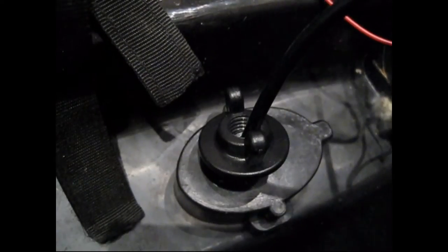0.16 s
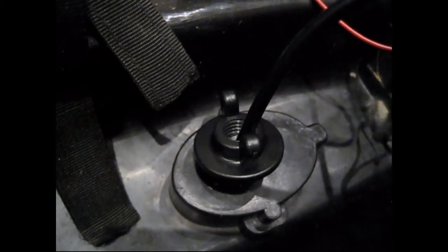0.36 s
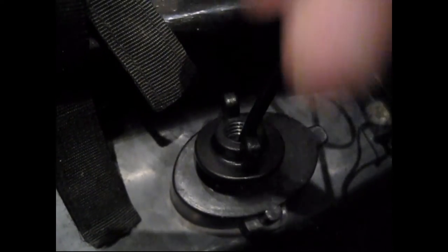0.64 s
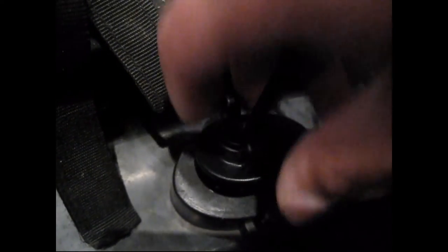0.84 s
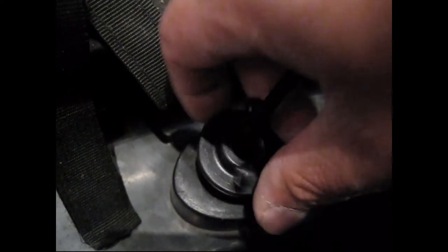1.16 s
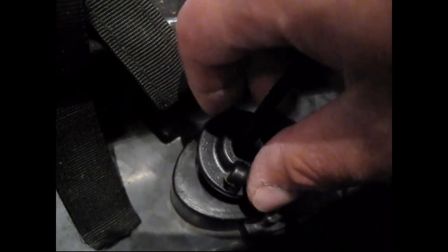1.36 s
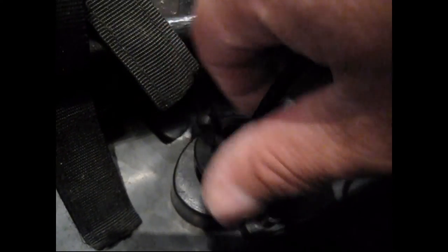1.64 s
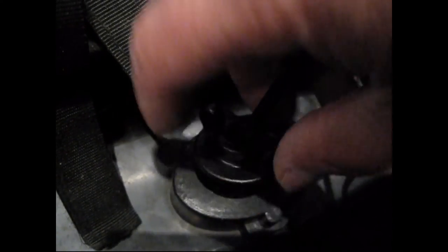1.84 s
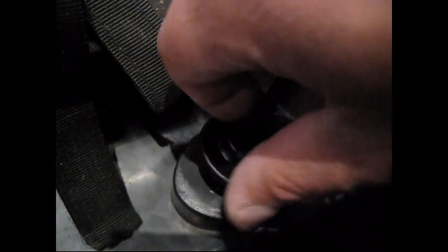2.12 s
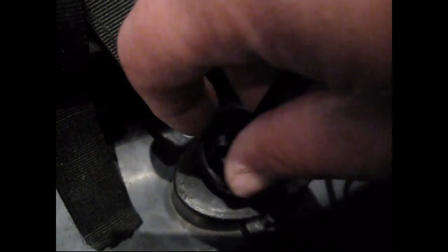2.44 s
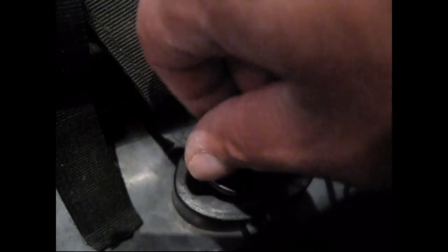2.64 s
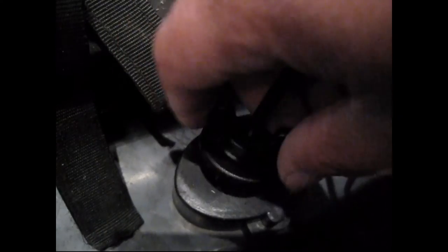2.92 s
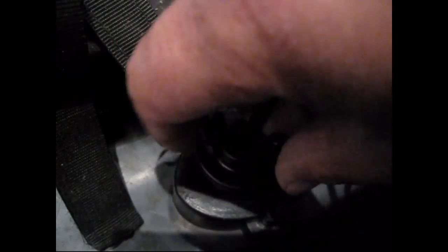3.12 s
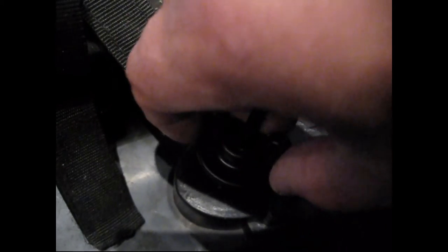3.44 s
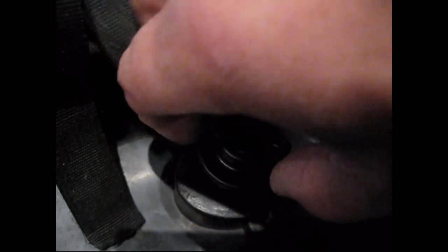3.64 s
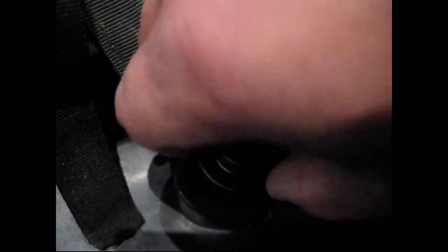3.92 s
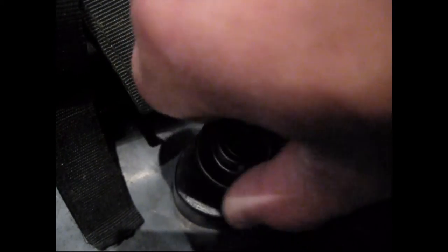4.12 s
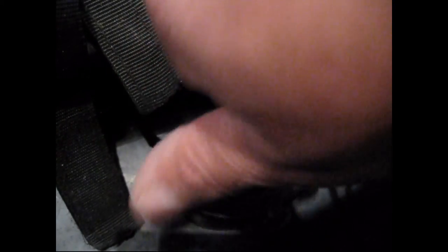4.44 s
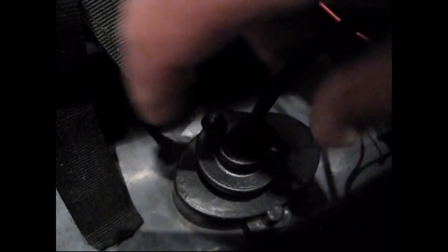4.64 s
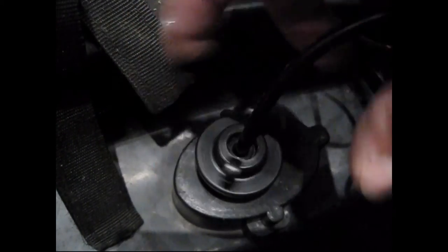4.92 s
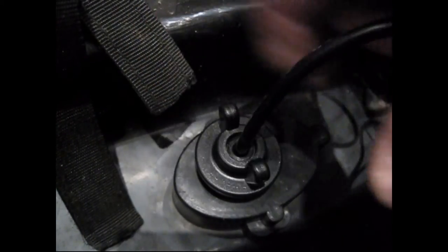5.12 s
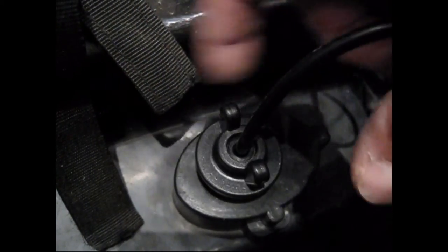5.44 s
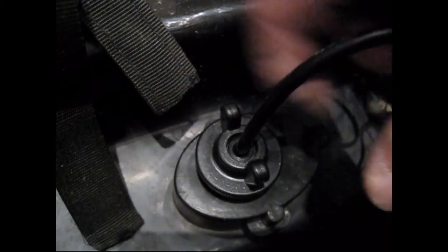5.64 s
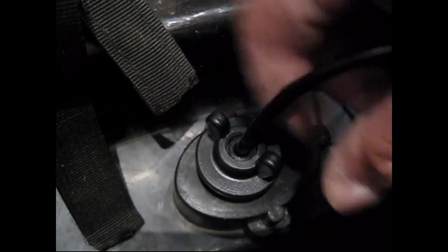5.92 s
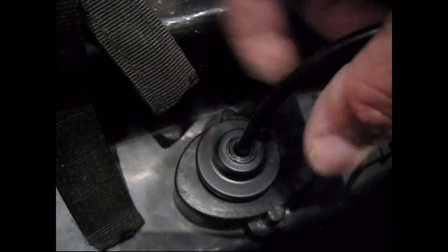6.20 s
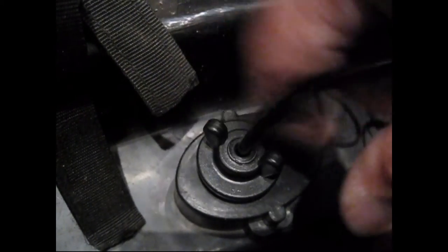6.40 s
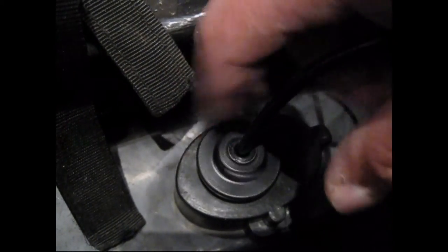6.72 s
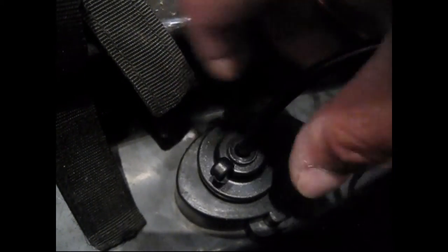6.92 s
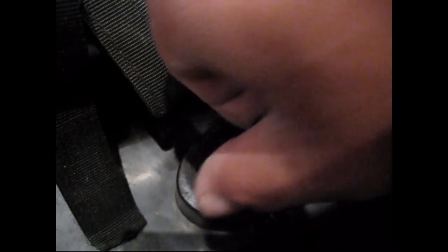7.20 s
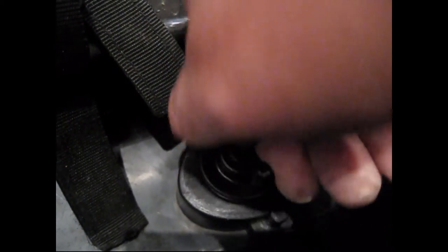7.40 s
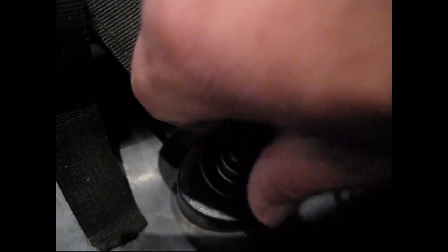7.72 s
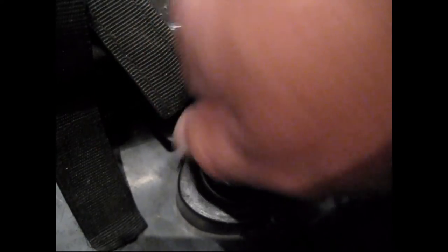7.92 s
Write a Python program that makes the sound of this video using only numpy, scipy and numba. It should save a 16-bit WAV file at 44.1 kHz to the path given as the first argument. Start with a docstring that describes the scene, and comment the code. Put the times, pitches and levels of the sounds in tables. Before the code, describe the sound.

Close, hollow plastic clicks and stick-slip grinding come in short bursts as fingers twist a nut, then harder knocks thud through a hull panel.

```python
"""A plastic wing nut is spun by hand down a threaded stem inside a boat hull, close to the microphone.
It opens on faint rumble and hiss with a finger's brush; then turns grip, grind in stick-slips and knock.
After three seconds the knocks thin out while the turning goes on; from about 4.5 s they return harder,
and between 5 and 6.7 s some jolt the hull panel. The last turns squeak, scrape and settle near 8 s.
Contact forces ring modes of nut, stem and hull, whose echoes hold the low notes; squeaks are rough tones."""
import sys
import numpy as np
from scipy import signal
from scipy.fft import rfft, irfft
from scipy.io import wavfile
from numba import njit

SR = 44100
rng = np.random.default_rng(int(sys.argv[2]) if len(sys.argv) > 2 else 0)


def to_wav(sig):
    """Store sig (one row per channel, or 1-D mono) as 16-bit WAV at the path in sys.argv[1].

    Samples outside -1..1 are clipped; the rate is SR.
    """
    pcm = np.clip(np.atleast_2d(sig), -1, 1) * 32767
    pcm = np.round(pcm).astype(np.int16)
    wavfile.write(sys.argv[1], SR, pcm.T)  # frames by channels


N = 355313
TIME = np.arange(N) / SR

# colour of the rumble and hiss: (f/Hz, relative level/dB)
AIR_COLOUR = [(15, -37), (25, -1.5), (141, -6), (293, -8.5), (3000, -20), (16000, -30)]
# modes of nut, stem and hull, low to high: (f/Hz, t60/s, relative level/dB)
BODY_MODES = [(138.3, 0.14, -3), (294, 0.16, 13), (402.2, 0.063, 0.5), (597.4, 0.054, -3.5),
              (767.3, 0.11, -6.5), (910, 0.0093, 3), (1357, 0.031, 5), (1596, 0.011, 3.5),
              (2130, 0.012, -1.5), (4020, 0.0019, 3.5), (4845, 0.0066, 1), (9130, 0.0017, 2),
              (11460, 0.0088, -2.5)]
# crowded small modes of panel, boom, nut, edge and tick: (t60/s, level against the strong modes/dB)
SMALL_MODES = [(0.16, -10), (0.058, -2), (0.054, -8), (0.011, 3), (0.0019, 1.5)]
# range of each of these five registers: (low f/Hz, high f/Hz)
REGISTER_RANGES = [(90, 300), (275, 750), (680, 2500), (2200, 6800), (8400, 12900)]
# the hand takes hold, turns and lets go: (t/s, length/s, thread grinding level/dB, skin friction level/dB)
HAND_TURNS = [(0.866, 0.088, -38, -44.5), (1.061, 0.21, -52, -43.5), (1.399, 0.23, -45.5, -57),
              (1.846, 0.29, -44.5, -57), (2.175, 0.29, -43.5, -82), (2.69, 0.22, -56.5, -52),
              (3.04, 0.15, -55, -53), (3.275, 0.033, -49, -52.5), (3.564, 0.18, -45.5, -68),
              (3.991, 0.15, -45.5, -61), (4.26, 0.26, -45.5, -72), (4.739, 0.18, -31.5, -57),
              (5.184, 0.14, -44, -43), (5.508, 0.089, -45.5, -60), (5.728, 0.23, -51, -47),
              (6.021, 0.18, -54, -40.5), (6.318, 0.21, -55, -46.5), (6.636, 0.22, -51, -46.5),
              (7.02, 0.057, -52, -38.5), (7.233, 0.12, -37, -39), (7.425, 0.25, -44, -42),
              (7.766, 0.23, -43.5, -41.5)]
# skin sticks to the plastic and squeaks: (t/s, length/s, f/Hz, level/dB)
SKIN_SQUEAKS = [(0.243, 0.023, 2260, -38.5), (3.168, 0.0025, 11300, -11.5), (5.274, 0.012, 9200, -19.5),
                (5.521, 0.022, 9480, -19.5), (7.162, 0.07, 9550, -35), (7.5, 0.029, 2930, -27),
                (7.503, 0.023, 5330, -21.5)]
# a finger slides off a wing or along the cable: (t/s, length/s, level/dB, skin hiss relative level/dB)
FINGER_RUBS = [(0.104, 0.14, -49, 0.5), (0.262, 0.019, -37.5, 0), (0.288, 0.0033, -23.5, 5.5),
               (1.742, 0.023, -27.5, -3), (2.3, 0.02, -48, 17), (2.713, 0.057, -38.5, 6.5),
               (3.614, 0.12, -37.5, -1.5), (4.405, 0.026, -51, 14), (4.539, 0.049, -36.5, 1),
               (4.951, 0.053, -37, -1.5), (5.214, 0.067, -35, -1.5), (5.795, 0.021, -33, 3),
               (6.124, 0.052, -28, -3), (6.297, 0.085, -35, 1.5), (6.392, 0.023, -29.5, 10.5),
               (6.597, 0.035, -39.5, 3.5), (6.745, 0.048, -31.5, 2), (7.497, 0.1, -35.5, 0.5),
               (7.795, 0.015, -26.5, 6)]
# the thread binds and scrapes: (t/s, length/s, level/dB)
THREAD_SCRAPES = [(0.874, 0.007, -21.5), (0.953, 0.022, -29), (1.069, 0.042, -34.5), (1.143, 0.035, -32.5),
                  (1.243, 0.016, -27), (1.306, 0.0073, -31.5), (1.569, 0.093, -41.5), (1.86, 0.045, -32.5),
                  (2.232, 0.036, -37), (2.396, 0.089, -45.5), (2.7, 0.024, -37), (2.797, 0.0091, -38.5),
                  (2.837, 0.08, -41), (3.066, 0.025, -33), (4.755, 0.054, -23), (4.827, 0.068, -34),
                  (5.75, 0.0093, -47), (5.796, 0.032, -18), (6.12, 0.098, -23), (7.785, 0.028, -31.5)]
# centres of the singing bands of the thread's faces: (f/Hz)
THREAD_SING = [9300, 11650, 12300]
# the stem jolts the hull panel: (t/s, level/dB)
PANEL_THUDS = [(5.018, -16.5), (5.274, -18.5), (5.576, -24), (6.081, -20.5), (6.406, -25.5), (6.653, -17)]
# the nut, or the cable that runs through it, knocks on the stem: (t/s, level/dB, hard edge relative level/dB)
NUT_KNOCKS = [(0.176, -38, 10), (0.408, -50, -2), (0.879, -21.5, -6), (0.917, -16, -1), (0.955, -25, -10),
              (1.11, -26, -25), (1.158, -20, -19), (1.212, -12, -20), (1.245, -26.5, -3.5),
              (1.264, -15.5, -26), (1.414, -25, -28), (1.464, -20, -26), (2.211, -12.5, -25),
              (2.266, -24.5, -21), (2.32, -14.5, -37), (2.427, -27, -24), (2.459, -30, -35),
              (2.539, -11, -22), (2.591, -27, -39), (2.736, -19, -23.5), (2.849, -24, -14.5),
              (2.859, -18, -31), (3.083, -32, -42), (3.138, -25, -44), (3.167, -26, -24), (3.65, -25, -3),
              (3.755, -32, -1), (4.425, -33.5, -38), (4.501, -26.5, -16.5), (4.58, -33.5, -7),
              (4.712, -13, -15.5), (5.017, -17, -18.5), (5.028, -7.5, -13.5), (5.064, -19, 0),
              (5.089, -15.5, -13), (5.187, -10.5, -5), (5.268, -17.5, -7.5), (5.279, -14, -38),
              (5.33, -21, -5.5), (5.577, -19.5, -8.5), (5.945, -29, -18.5), (6.08, -7, -19),
              (6.129, -16.5, -12), (6.149, -14, -14), (6.173, -18.5, -34), (6.225, -14, -23),
              (6.406, -12.5, -14.5), (6.429, -13.5, -1.5), (6.655, -10.5, -16.5), (6.727, -20, -26),
              (6.767, -18, -20), (6.83, -17.5, -5.5), (7.007, -13.5, -20.5), (7.371, -28, -17),
              (7.499, -22, -7.5), (7.954, -26, -23)]

AIR_DB = -49.5
TOP_HZ = 16000
BLOW_S = .01  # a knock's level is its rms over this time
FIRMING_DB_PER_S = 3.5  # the push grows during each turn
HOLD_FROM_S, HOLD_TO_S, HOLD_DB = 0.8, 5.8, -56  # a faint steady brush of the fingers under the turns
DULL_DB, DULL_SLOPE = -22, 0.5  # contacts softer than this favour the hull, by so many dB for each dB
DULLEST_DB = 19.5  # the most that the hull gains
# typical pitch sway: a share of the pitch, but no more than so many Hz; and how often the grip changes
GRIP_SHARE, GRIP_SHIFT_HZ, GRIP_PER_S = .028, 40, 14


def undb(db):
    """Decibels to gain."""
    return np.exp(np.asarray(db) * (np.log(10) / 20))


def unit(x):
    """Scale to an energy of one."""
    return x / np.sqrt(np.sum(x ** 2) + 1e-18)


def fade(t, t60):
    """Exponential decay, 60 dB in t60."""
    return np.exp(-np.log(1000) * t / t60)


def band(x, low_hz, high_hz, order=2):
    """Butterworth band-pass."""
    sos = signal.butter(order, [low_hz, min(high_hz, TOP_HZ)], "band", fs=SR, output="sos")
    return signal.sosfilt(sos, x + 1e-18)


def add(track, s, x):
    """Mix x into the track at time s."""
    i = int(s * SR)
    track[..., i:i + x.shape[-1]] += x[..., :N - i]


def walk(rate):
    """Slow chance: random levels around zero, rate per second, joined by straight lines."""
    levels = np.clip(rng.standard_normal(N // 20), -2, 2)
    return np.interp(TIME * rate, np.arange(len(levels)), levels)


def slips(rate, spread_db):
    """Stick-slip friction: tiny releases at random moments and of uneven size, rms one."""
    sizes = undb(spread_db * np.clip(rng.standard_normal(N), -2, 2)) * rng.choice([-1, 1], N)
    releases = rng.random(N) < rate / SR
    return unit(sizes * releases) * np.sqrt(N)


def stroke(length, rise, fall):
    """Pressure of one slide: it builds up, holds and lets go (rise and fall in s)."""
    t = np.arange(int((max(length, 0) + fall) * SR)) / SR
    return np.clip(t / rise, 0, 1) * np.clip((t[-1] - t) / fall, 0, 1) ** 2


def air():
    """Faint steady rumble and microphone hiss: noise with a shaped spectrum."""
    hz, db = np.transpose(AIR_COLOUR)
    colour = undb(np.interp(np.log(np.fft.rfftfreq(N, 1 / SR) + 1), np.log(hz), db))
    noise = irfft(rfft(rng.standard_normal(N)) * colour, N)
    return unit(noise) * np.sqrt(N) * undb(AIR_DB)


def hull(x):
    """The hollow hull echoes: low notes linger, the top treble is not reflected."""
    t = TIME[:SR // 2]

    def tail(low_hz, high_hz, t60, db):
        """Diffuse echoes in one range, swelling before they decay."""
        echoes = unit(rng.standard_normal(len(t)) * fade(t, t60) * (1 - fade(t, .03)))
        return undb(db) * band(echoes, low_hz, high_hz)

    lows = tail(93, 636, t60=0.38, db=-11) + tail(650, 1650, t60=0.13, db=-10.5)
    treble = tail(2400, 7000, t60=.2, db=-19)
    return x + signal.oaconvolve(x, lows + treble)[:N]


def hull_share(db):
    """The hull's boom relative to the nut, in dB: gentle contacts are dull, hard ones ring the nut."""
    return min(DULL_SLOPE * (DULL_DB - db), DULLEST_DB)


@njit
def swing(push, step, keep):
    """A damped mass on a spring whose stiffness may change from moment to moment."""
    out, place, speed = np.empty(len(push)), 0., 0.
    for i in range(len(push)):
        speed = keep * speed - step[i] * place + push[i] + 1e-18
        place += step[i] * speed
        out[i] = place
    return out


def ring(push, hz, t60):
    """One mode; the changing grip sways its pitch, the low modes by the largest share."""
    shift = min(GRIP_SHARE, GRIP_SHIFT_HZ / hz) * walk(rate=GRIP_PER_S)
    angle, keep = np.pi * hz / SR, fade(2 / SR, t60)
    gain = np.sqrt(2 * (1 - keep)) * np.cos(angle)
    return gain * swing(push, 2 * np.sin(angle) * (1 + shift), keep)


def body(force):
    """Each register rings with its few strong modes and a crowd of small ones."""
    t, out = TIME[:SR // 5], 0
    groups = np.split(np.array(BODY_MODES), [2, 4, 9, 11])  # panel, boom, nut, edge, tick
    registers = zip(force, groups, REGISTER_RANGES, SMALL_MODES)
    for push, modes, (low_hz, high_hz), (t60, crowd_db) in registers:
        # as the point of contact moves, it favours now one mode and now another
        weights = np.array([undb(db + 3.5 * walk(rate=25)) for db in modes[:, 2]])
        weights = weights / np.linalg.norm(weights, axis=0)
        strong = np.zeros(N)
        for k, (hz, decay, _) in enumerate(modes):
            # neighbouring modes swing in opposite senses
            strong += (-1) ** k * ring(push * weights[k], hz, decay)
        sound = band(strong, low_hz, high_hz, order=4)
        # the push wanders between two crowds of small modes
        place = 2 * walk(rate=GRIP_PER_S)
        for share in (np.cos(place), np.sin(place)):
            crowd = band(rng.standard_normal(len(t)) * fade(t, t60), low_hz, high_hz, order=3)
            sound = sound + undb(crowd_db) * signal.oaconvolve(push * share, unit(crowd))[:N]
        out = out + sound / np.hypot(1, undb(crowd_db))
    return out


def turning(rise=0.0047, fall=0.079):
    """Each turn grips quickly, firms up and lets go; returns the pressure on the thread and on the skin."""
    pressure = np.zeros((2, N))
    for s, length, grind_db, skin_db in HAND_TURNS:
        push = stroke(length, rise, fall)
        push = push * undb(FIRMING_DB_PER_S * TIME[:len(push)])
        add(pressure, s, undb([[grind_db], [skin_db]]) * push)
    add(pressure, HOLD_FROM_S, undb(HOLD_DB) * stroke(HOLD_TO_S - HOLD_FROM_S, rise, fall))
    return pressure


def squeaks(rise=0.0027, fall=0.002, jitter=0.056, drift=0.0058):
    """Very fast stick-slip: a short, rough whistle whose period never quite repeats."""
    out = np.zeros(N)
    speed = 1 + jitter * walk(rate=2200) + drift * walk(rate=27)
    for s, length, hz, db in SKIN_SQUEAKS:
        push = undb(db) * stroke(length, rise, fall)
        cycles = np.cumsum(hz * speed[int(s * SR):][:len(push)]) / SR
        add(out, s, np.sqrt(2) * push * np.sin(2 * np.pi * cycles))
    return out


def fingers(rise=0.00094, fall=0.0049, edge_db=-8, nut_db=-1, boom_db=-11, squeak_rub_db=-11, glide_db=0.5):
    """Skin gliding on the plastic hisses smoothly; sliding off a wing it catches in coarser slips."""
    _, skin = turning()
    glide = skin * undb(5 * walk(rate=35)) * rng.standard_normal(N)
    # every squeak comes with a softer rub
    squeak_rubs = [(s, length, db + squeak_rub_db, 0) for s, length, _, db in SKIN_SQUEAKS]
    slide_push, hiss_push = np.zeros((2, N))
    for s, length, db, hiss_db in list(FINGER_RUBS) + squeak_rubs:
        push = undb(db) * stroke(length, rise, fall)
        add(slide_push, s, push)
        add(hiss_push, s, push * undb(hiss_db))
    grain = slips(rate=4500, spread_db=10.5)
    slide = slide_push * grain
    boom = slide * undb(boom_db)
    nut = slide * undb(nut_db) + glide * undb(glide_db)
    edge = slide + glide * undb(edge_db)
    tick = hiss_push * grain + glide * undb(-2.5)
    return np.array([np.zeros(N), boom, nut, edge, tick])


def thread(rise=0.00087, fall=0.022, boom_db=1.0, edge_db=-17, panel_db=-26, hiss_db=-6, sing_width_hz=280):
    """The thread grinds as the nut turns, and harder where it binds; the hull takes up separate jerks."""
    turn_push, _ = turning()
    nut_push = turn_push.copy()
    boom_push = turn_push * undb(boom_db)
    for s, length, db in THREAD_SCRAPES:
        push = undb(db) * stroke(length, rise, fall)
        add(nut_push, s, push)
        add(boom_push, s, push * undb(hull_share(db) + boom_db))
    jerks = slips(rate=690, spread_db=-1.0)
    grit = nut_push * slips(rate=880, spread_db=8)
    # the swaying stem favours the jerks near 400 Hz
    judder = .4 * jerks + 1.5 * band(jerks, low_hz=365, high_hz=440, order=1)
    # blunt plastic ridges mostly reach the lower part of the hard edge
    edge = undb(edge_db) * band(grit, low_hz=1430, high_hz=5230, order=1)
    # the ridges' faces sing in narrow bands, each swelling and fading
    sing = np.zeros(N)
    for hz in THREAD_SING:
        level = undb(2.5 * walk(rate=GRIP_PER_S))
        noise = rng.standard_normal(N)
        sing += level * band(noise, hz - sing_width_hz / 2, hz + sing_width_hz / 2, order=1)
    hiss = undb(hiss_db) * turn_push * sing
    # the thread catches and frees
    catch = undb(3 * walk(rate=70))
    return catch * np.array([boom_push * jerks * undb(panel_db), boom_push * judder, grit, edge, hiss])


def knocks(chatter_s=0.0054, chatter_db=-3, approach_db=-16, tick_db=-6, hardness=0.97, boom_db=-8,
           glance=0.14, rock_s=0.00781, rock_db=1.0):
    """The nut grazes the thread, strikes it and chatters as it seats; returns the force on each register."""
    force = np.zeros((5, N))
    t = TIME[:SR // 20] - TIME[SR // 100]  # time from the moment of contact
    chatter = slips(rate=1500, spread_db=3.0)
    pressure = np.where(t < 0, undb(approach_db), 1) * fade(np.abs(t), 2 * chatter_s)
    contact = (t == 0) * np.sqrt(BLOW_S * SR)
    rock_lags = rock_s * (.5 + rng.random(len(NUT_KNOCKS)))
    for k, (s, db, edge_db) in enumerate(NUT_KNOCKS):
        start = s + t[0]
        grains = chatter[k * len(t):(k + 1) * len(t)]
        rattle = undb(chatter_db) * unit(grains * pressure) * np.sqrt(BLOW_S * SR)
        # the heavy hull follows only the main contact, less so a sharp one
        boom = undb(db + boom_db + hull_share(db) - glance * edge_db) * contact
        add(force[1], start, boom)
        add(force[1], start + rock_lags[k], boom * undb(rock_db))  # the stem rocks back a moment later
        nut_edge_tick_db = db + np.array([[0], [edge_db], [hardness * edge_db + tick_db]])
        add(force[2:], start, undb(nut_edge_tick_db) * (contact + rattle))
    for s, db in PANEL_THUDS:
        add(force[0], s + t[0], undb(db) * contact)
    return force


def scene():
    """All contacts drive the same nut and hull; the squeaks skip the modes but echo in the hull."""
    contacts = body(knocks() + thread() + fingers())
    return (hull(contacts + squeaks()) + air())[None]


def record(dry, notch_hz=7900, notch_width_hz=750):
    """The recorder has a deep notch in the treble, rounds the loudest peaks and cuts the top."""
    b, a = signal.iirnotch(notch_hz, notch_hz / notch_width_hz, fs=SR)
    notched = signal.lfilter(b, a, signal.lfilter(b, a, dry))
    rounded = np.tanh(notched)
    return signal.sosfilt(signal.ellip(8, .2, 70, TOP_HZ, fs=SR, output="sos"), rounded)


dry = scene()
out = record(dry)
to_wav(out)
```